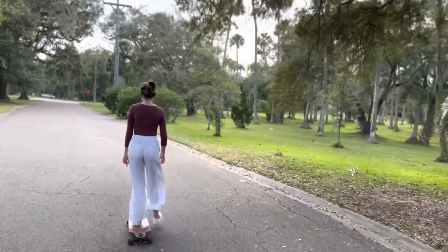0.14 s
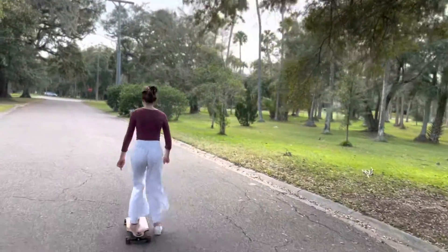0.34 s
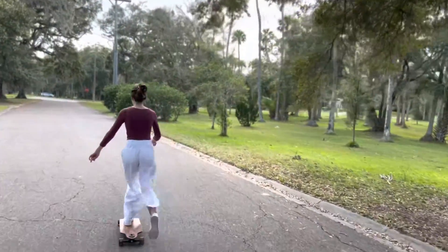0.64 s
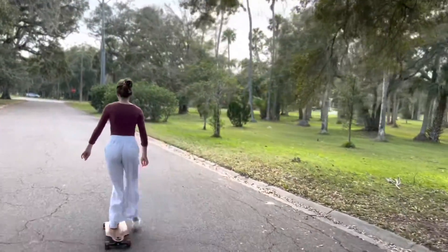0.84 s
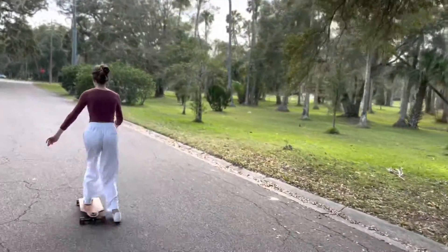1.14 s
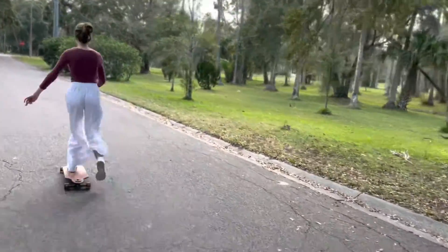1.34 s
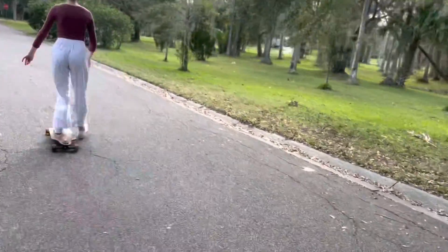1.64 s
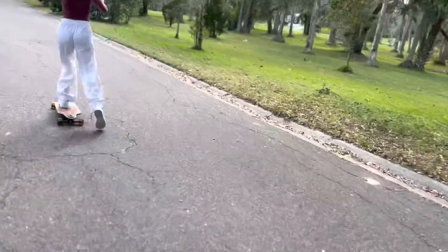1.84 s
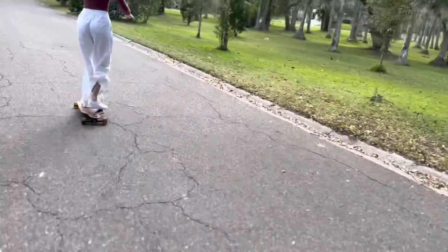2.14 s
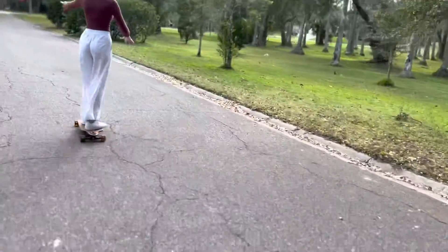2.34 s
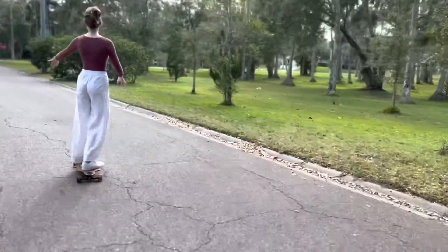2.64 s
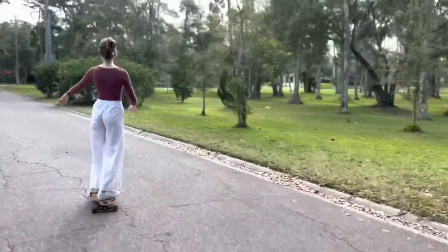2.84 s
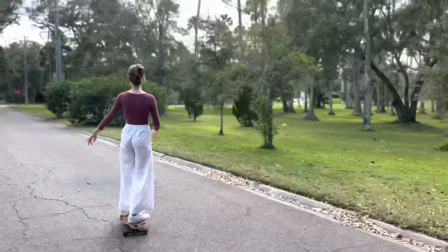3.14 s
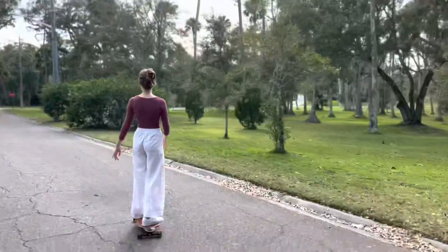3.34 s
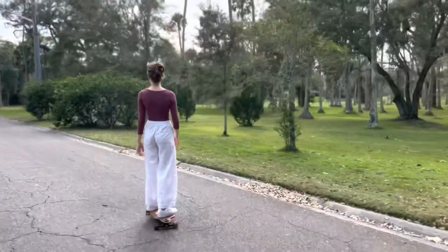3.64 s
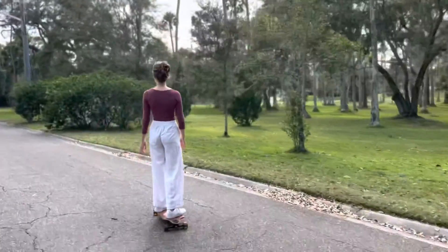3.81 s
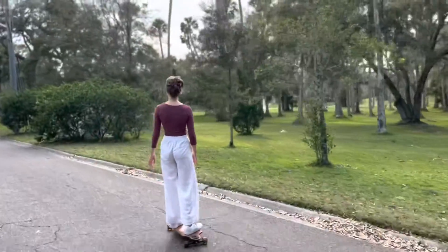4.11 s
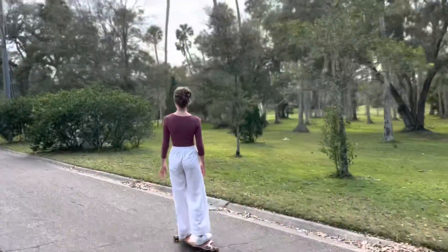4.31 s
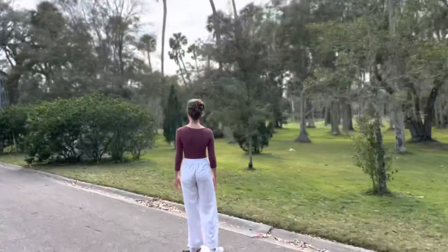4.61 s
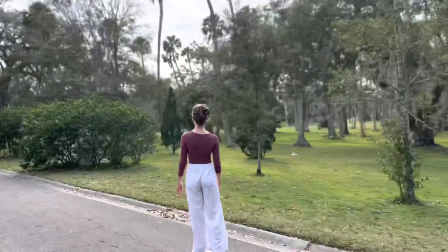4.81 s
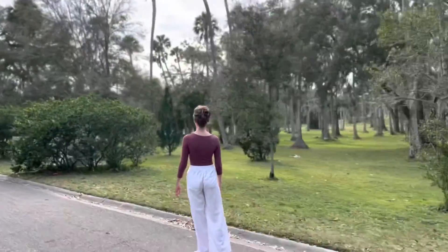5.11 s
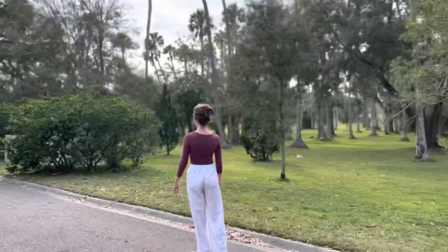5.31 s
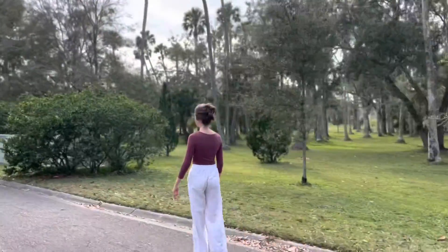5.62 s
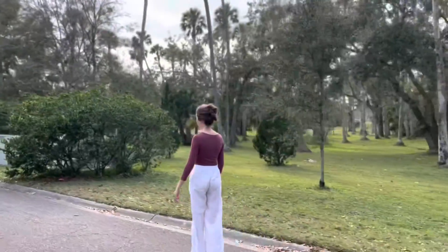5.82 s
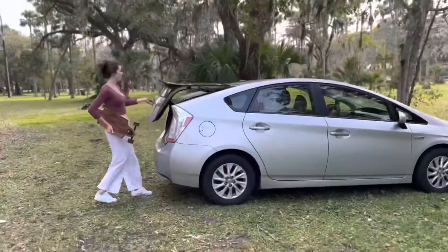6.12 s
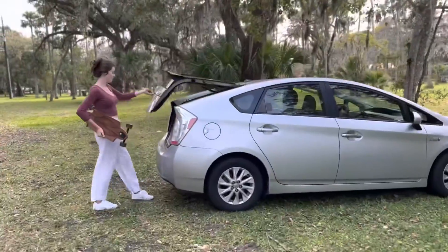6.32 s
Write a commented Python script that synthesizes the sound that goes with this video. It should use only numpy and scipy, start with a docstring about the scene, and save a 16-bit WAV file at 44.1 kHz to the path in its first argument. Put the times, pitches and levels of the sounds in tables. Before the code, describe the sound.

A skateboard rolls over old cracked asphalt in an open park, heard fairly close from behind. From 0 to 1.5 s, hollow mid-low wheel roar carries dense, uneven clacks and pebble ticks, thickest in the first 0.3 s, with fleeting wheel rings and a soft shoe scrape around 0.2 s. Another scrape peaks at 1.4 s; then smoother booming roll until a hard clack at 2.4 s, a strong scrape at 2.55 s and a heavy deck thump at 2.7 s. It glides more evenly until a rattling cluster and scrape at 3.55-3.75 s, then more knocks and ringing wheels at 4-4.6 s. From 4.7 s the roar thins as deep fluttering rumble and thumps grow, with faint bearing jingle and tiny high bird whistles at 5.1-5.9 s. At 5.9 s everything cuts to very quiet lawn air; dry leaves rustle briefly from about 6.35 s.

```python
"""Skateboard on old asphalt, then a quiet lawn

Random grains of road texture excite the resonances of deck and wheels; short gritty contacts make clacks,
and the deck's boom swells and thumps. Scrapes, tread hiss and jingling bearings are noise and tiny impacts.
A rough stretch rumbles as coloured noise, and small birds whistle as gliding sines.
Then the scene changes abruptly to still air over a lawn, with a short rustle of dry leaves made of grains."""
import sys
import numpy as np
from scipy import signal
from scipy.fft import rfft, irfft, next_fast_len
from scipy.io import wavfile

SR = 44100
rng = np.random.default_rng(int(sys.argv[2]) if len(sys.argv) > 2 else 0)


def wrap_up_sound(samples):
    """Save the sound to the file named by the first command line argument, as 16-bit audio."""
    columns = np.atleast_2d(samples).T
    # keep every value between -1 and 1, then stretch to whole-number steps
    tamed = np.clip(columns, -1, 1)
    steps = np.round(tamed * 32767).astype(np.int16)
    wavfile.write(sys.argv[1], SR, steps)


N = 284886
TIME_S = np.arange(N) / SR
RIDE_END_S = 5.925


def from_db(db):
    """Logarithmic level: decibels to amplitude gain."""
    return 10 ** (np.asarray(db) / 20)


def rms_one(x):
    """Normalisation: scale the whole array to unit power."""
    return x / np.sqrt(np.mean(x ** 2) + 1e-20)


def in_time(rows):
    """Linear interpolation: each column of a curve, sample by sample."""
    knots_s, *columns = np.transpose(rows)
    return [np.interp(TIME_S, knots_s, column) for column in columns]


def gain_at(points, hz):
    """Spectral envelope: decibels interpolated over log frequency, as gain."""
    knots_hz, db = np.transpose(points)
    return from_db(np.interp(np.log(np.maximum(hz, 1)), np.log(knots_hz), db))


def colour(x, points):
    """Linear filtering: multiply the spectrum by a smooth, zero-phase gain."""
    size = next_fast_len(N, real=True)
    gain = gain_at(points, np.fft.rfftfreq(size, 1 / SR))
    return irfft(rfft(x, size) * gain, size)[..., :N]


def drift(per_s):
    """Random modulation: chance values joined by lines, of unit rms."""
    knots = rng.standard_normal(4000)
    return rms_one(np.interp(TIME_S * per_s, np.arange(len(knots)), knots))


def resonate(x, hz, width_hz):
    """Resonance: two equal sections in cascade, so a ring swells briefly, then dies; steep skirts."""
    r = np.exp(-np.pi * width_hz / SR)
    zeros = [(1 - r * r) / 2, 0, (r * r - 1) / 2]
    poles = [1, -2 * r * np.cos(2 * np.pi * hz / SR), r * r]
    section = zeros + poles
    tiny = 1e-18 * (np.arange(x.shape[-1]) % 3)   # keeps the filter state from vanishing
    return signal.sosfilt([section, section], x + tiny)


def strike(times, peak_db, hz, width_hz):
    """Impulse response: blows on one mode, each ringing up to its peak level."""
    clicks = np.zeros(N)
    clicks[np.clip(np.round(times * SR).astype(int), 0, N - 1)] = from_db(peak_db)
    return resonate(clicks, hz, width_hz) * np.e * SR / (2 * np.pi * width_hz)


def struck(contact, hz, width_hz, level_db):
    """Forced vibration: one mode rung by a contact, up to a given rms level at its loudest."""
    ring = resonate(contact, hz, width_hz)
    return ring / np.abs(ring).max(axis=-1, keepdims=True) * np.sqrt(2) * from_db(level_db)


def grains(per_s, spread_db, smooth):
    """Shot noise: mid and side trains of tiny uneven impacts, on a bed of smooth noise."""
    size_db = spread_db * np.minimum(rng.exponential(1, (2, N)), 4)
    sizes = from_db(size_db) * rng.choice([-1, 1], (2, N))
    impacts = rms_one(sizes * (rng.random((2, N)) < per_s / SR))
    return rms_one(impacts + smooth * rng.standard_normal((2, N)))


def air(spectrum, flutter_db, per_s):
    """Broadband noise: mid and side of one colour whose level flutters."""
    noise = colour(rng.standard_normal((2, N)), spectrum)
    return rms_one(noise * from_db(flutter_db * drift(per_s)))


# Colour of the still air over the lawn. Each row: frequency in Hz, relative density in dB per Hz.
LAWN_COLOUR = [(20, -16), (50, 7.5), (80, 5.5), (110, 3.5), (200, -8.5), (400, -21), (520, -18.5),
               (620, -22), (850, -15.5), (1150, -26), (1600, -27), (2700, -31.5), (5000, -42.5),
               (15000, -33)]


def lawn_air():
    """Ambient noise: a faint coloured bed, fluttering in level."""
    return air(LAWN_COLOUR, flutter_db=1.0, per_s=8.7) * from_db(-46)


# Swell of dry leaves underfoot. Each row: time in seconds, level in dB.
RUSTLE_LEVEL = [(5.95, -80), (6.12, -63), (6.22, -70), (6.335, -72), (6.358, -47), (6.385, -48),
                (6.415, -44), (6.435, -49), (6.46, -50)]
# Colour of the leaves. Each row: frequency in Hz, filter gain in dB.
LEAF_COLOUR = [(300, -8), (900, -4), (1700, -1.5), (3000, -5.5), (6000, -8.5), (9000, -12), (15000, -15)]


def leaves():
    """Granular friction: a dense train of small impacts, coloured and swelled."""
    crackle = colour(grains(per_s=2400, spread_db=2.5, smooth=0.67), LEAF_COLOUR)
    return rms_one(crackle) * from_db(in_time(RUSTLE_LEVEL)[0])


# Bird whistles. Each row: start in seconds, length in seconds, start pitch in Hz, end pitch in Hz,
# mid rms level in dB at the loudest, octave overtone in dB against the fundamental.
BIRD_WHISTLES = [(2.25, .08, 7300, 7100, -60, -30), (2.335, .075, 7100, 6850, -55, -30),
                 (5.06, .05, 6400, 6550, -58, -30), (5.25, .055, 6150, 5000, -62, 1),
                 (5.61, .06, 7100, 6900, -59, -30), (5.68, .1, 6900, 6550, -55, -30),
                 (5.785, .08, 6600, 6480, -52, -30)]


def birds():
    """Frequency modulation: thin, wavering whistles that bend at their ends."""
    out, waver_hz = np.zeros(N), 55 * drift(600)
    for start_s, length_s, from_hz, to_hz, level_db, octave_db in BIRD_WHISTLES:
        u = np.clip((TIME_S - start_s) / length_s, 0, 1)
        pitch_hz = from_hz + (to_hz - from_hz) * u ** 2 + waver_hz
        phase = 2 * np.pi * np.cumsum(pitch_hz) / SR
        tone = np.sin(phase) + from_db(octave_db) * np.sin(2 * phase)
        swell = 2 * np.sqrt(2 * u * (1 - u))
        out += from_db(level_db) * swell * tone
    return out * [[1], [.5]]


# Colour of the rumble. Each row: frequency in Hz, relative density in dB per Hz.
RUMBLE_COLOUR = [(20, -38), (45, -6.5), (85, -2.5), (140, -2), (220, -4.5), (330, -12), (550, -12.5),
                 (1200, -65.5), (4000, -69.5)]
# Swell of the rumble. Each row: time in seconds, mid level in dB.
RUMBLE_LEVEL = [(0, -32), (.7, -32.5), (1.4, -47), (2.0, -29.5), (3.4, -38.5), (3.56, -42), (3.7, -37),
                (4.3, -32.5), (4.7, -26), (5.05, -22), (5.18, -17), (5.5, -17.5), (5.9, -16.5)]


def road_rumble():
    """Random excitation: rough road as low, fluttering noise, weaker at the side than in the middle."""
    noise = air(RUMBLE_COLOUR, flutter_db=0.95, per_s=30)
    return noise * from_db(in_time(RUMBLE_LEVEL)[0]) * from_db([[0], [-6]])


# Modes of loose bearing parts. Each row: frequency in Hz, basic width in Hz, relative drive in dB.
BEARING_MODES = [(6550, 410, 2), (7030, 540, 4), (7600, 260, 7.5), (13400, 710, 2)]
# Steady jingle. Each row: time in seconds, level in dB, before random flutter.
JINGLE_LEVEL = [(0, -82), (2.7, -74), (3.05, -70), (3.4, -72), (4.6, -66), (5.5, -65), (5.75, -56),
                (5.9, -60)]
# Jolts that set the parts jingling harder. Each row: time in seconds, added peak level in dB.
JINGLE_FLURRIES = [(2.812, -54), (2.876, -60), (3.055, -52), (3.078, -56), (3.183, -66), (3.237, -60),
                   (3.421, -58), (3.717, -54), (3.791, -56), (3.911, -58), (4.09, -56), (4.281, -53),
                   (4.601, -52), (4.715, -52), (4.821, -59), (4.886, -48), (4.952, -55), (4.985, -57),
                   (5.141, -53), (5.424, -54), (5.53, -51), (5.683, -52), (5.886, -58)]
FLURRY_S = 0.0045   # from the peak of a flurry to a quarter of its gain


def bearings():
    """Modal excitation: irregular light ticks ring the bearing shields, in short flurries at each jolt."""
    level = from_db(in_time(JINGLE_LEVEL)[0] + 2.0 * drift(45))
    for jolt_s, peak_db in JINGLE_FLURRIES:
        level = level + from_db(peak_db) / (1 + ((TIME_S - jolt_s) / FLURRY_S) ** 2) ** 2
    ticks = grains(per_s=900, spread_db=1.5, smooth=.4)
    rings = sum(resonate(ticks * from_db(db), hz, width_hz * 2.0) for hz, width_hz, db in BEARING_MODES)
    return rms_one(rings) * level


# Colour of treads on grit. Each row: frequency in Hz, filter gain in dB.
HISS_COLOUR = [(1500, 11.5), (3000, -0.5), (4500, 7.5), (5600, 7.5), (7300, 7), (9000, 6.5), (10000, 3.5),
               (11100, 11), (12400, 0), (14300, 2.5), (15500, 4.5)]
# Swell of the tread hiss. Each row: time in seconds, level in dB.
HISS_LEVEL = [(0, -52), (0.65, -56), (1.0, -54.5), (1.4, -50.5), (2.2, -52), (2.45, -48), (2.95, -54.5),
              (3.3, -53.5), (3.68, -48.5), (3.9, -52), (4.4, -50.5), (4.7, -54), (5.6, -53), (5.8, -52),
              (5.9, -53)]


def tread_hiss():
    """Granular noise: grit crackles under the treads, in spurts that die within milliseconds."""
    bursts = 1.0 * (rng.random(N) < 35 / SR)
    decay = np.exp(-1 / (0.0052 * SR))
    spurts = signal.lfilter([1], [1, -decay], bursts + 1e-18)
    grit = grains(per_s=1700, spread_db=1.0, smooth=1.7) * (1 + spurts) * from_db(1.3 * drift(35))
    return rms_one(colour(grit, HISS_COLOUR)) * from_db(in_time(HISS_LEVEL)[0])


# A narrow ring near 590 to 660 Hz that comes and goes.
# Each row: time in seconds, level in dB, pitch in Hz.
WHEEL_RING_CURVE = [(0, -35, 645), (.24, -26, 650), (.38, -40, 664), (.55, -25, 617), (.75, -39, 630),
                    (1.2, -42.5, 630), (1.55, -30, 598), (1.9, -44, 600), (3.3, -43, 624), (4.05, -31, 588),
                    (4.3, -28, 613), (4.45, -26.5, 650), (4.6, -35, 657), (5.9, -40, 610)]
WHEEL_RING_WIDTH_HZ = 107


def wheels():
    """Time-varying resonance: sparse knocks ring one wheel mode; its pitch and level follow set curves."""
    level_db, hz = in_time(WHEEL_RING_CURVE)
    pole = np.exp(-np.pi * WHEEL_RING_WIDTH_HZ / SR)
    # shifting the knocks down to 0 Hz and the ring back up lets the pitch glide
    turn = np.exp(2j * np.pi * np.cumsum(hz) / SR)
    knocks = grains(per_s=120, spread_db=2.5, smooth=0.24) * turn.conj()
    ring = turn * signal.lfilter([1], [1, -2 * pole, pole * pole], knocks)
    return rms_one(ring.real) * from_db(level_db)


# A sole pushes off or the wheels scrub sideways. Each row: start in seconds, loudest moment in seconds,
# end in seconds, sole level in dB, wheel scrub drive in dB, crushed grit level in dB.
SCRAPE_EVENTS = [(-.08, 0.2, 0.26, -36, -45.5, -41), (1.24, 1.426, 1.53, -25, -40.5, -44),
                 (2.447, 2.55, 2.565, -21.5, -30.5, -40), (3.47, 3.693, 3.73, -30, -37, -38),
                 (4.3, 4.465, 4.58, -31, -41, -45)]


def stroke(level_db):
    """Contact loading: each scrape swells as the contact is loaded and stops as it lifts."""
    shapes = [np.interp(TIME_S, np.sort(row[:3]), [0, 1, 0]) for row in SCRAPE_EVENTS]
    return sum(from_db(db) * shape for db, shape in zip(level_db, shapes))


def near_scrapes(lead_s, width_s):
    """Gaussian window: a bell of height 1, lead_s ahead of the loudest moment of each scrape."""
    return sum(np.exp(-((TIME_S - row[1] + lead_s) / width_s) ** 2) for row in SCRAPE_EVENTS)


# Colour of a sole on asphalt. Each row: frequency in Hz, filter gain in dB.
SOLE_COLOUR = [(200, -20), (400, -15), (520, 16.5), (620, 1), (800, 12), (1100, 7), (1450, -3.5),
               (1800, 6.5), (2400, -4.5), (3000, -20), (3600, -18), (4300, -36), (7000, -46), (14000, -64)]
# Colour of grit cracking under load. Each row: frequency in Hz, filter gain in dB.
GRIT_COLOUR = [(900, 32), (1800, 15), (2600, 14), (3700, 12), (4600, 20), (5400, -40), (12000, -24)]


def scrapes():
    """Stick-slip friction: the sole grinds in dense grains; single bits of grit crack brightly."""
    _, _, _, sole_db, _, grit_db = np.transpose(SCRAPE_EVENTS)
    slips = grains(per_s=330, spread_db=2.2, smooth=.18) * from_db(3.0 * drift(130))
    cracks = grains(per_s=110, spread_db=1.6, smooth=.08)
    sole = rms_one(colour(slips, SOLE_COLOUR)) * stroke(sole_db)
    grit = rms_one(colour(cracks, GRIT_COLOUR)) * stroke(grit_db)
    return sole + grit


# Boom of the deck on uneven road. Each row: time in seconds, drive in dB, before swing, unloading and trim.
BOOM_DRIVE = [(0, -40), (.3, -36.5), (.5, -25.5), (.8, -23), (1.03, -27.5), (1.17, -22.5), (1.4, -35.5),
              (1.69, -19), (2.03, -29.5), (2.2, -21.5), (2.5, -35), (2.66, -16.5), (2.82, -22), (3.45, -30),
              (3.8, -25), (4.25, -24.5), (4.65, -31), (5.1, -45)]
# Low thumps of the deck, and a few brief low swells near 200 Hz. Each row: time in seconds, peak level in dB,
# pitch in Hz.
LOW_THUMPS = [(1.245, -18, 201), (1.6, -17.5, 192), (2.171, -19, 94), (2.378, -12, 95), (2.646, -11.5, 93),
              (2.675, -7.5, 98.3), (3.1, -28, 55), (3.558, -13, 65), (3.716, -15.5, 84), (3.956, -24, 55),
              (4.116, -16.5, 92), (4.236, -16, 92.5), (4.383, -14.5, 75), (4.506, -16, 91.5),
              (4.872, -13, 86.5), (5.19, -13, 88.5), (5.295, -11.5, 206), (5.505, -10.5, 111),
              (5.63, -10.5, 200), (5.845, -11.5, 71)]
DECK_HZ, DECK_WIDTH_HZ, THUMP_WIDTH_HZ = 104, 54, 41
BOUNCE_SWING_DB, BOUNCES_PER_S = 2.5, 18   # the boom comes and goes by chance
UNLOAD_DB, UNLOAD_S = 25, 0.043   # it drops while a scrape takes weight off the deck


def deck():
    """Bending vibration: the loaded deck booms at its lowest mode, with low thumps and swells."""
    swing_db = BOUNCE_SWING_DB * drift(BOUNCES_PER_S)
    unload_db = UNLOAD_DB * near_scrapes(0, UNLOAD_S)
    boom_db = in_time(BOOM_DRIVE)[0] + swing_db - unload_db - 4.5
    boom = rms_one(resonate(rng.standard_normal((2, N)), DECK_HZ, DECK_WIDTH_HZ)) * from_db(boom_db)
    thumps = sum(strike(s, peak_db, hz, THUMP_WIDTH_HZ) for s, peak_db, hz in LOW_THUMPS)
    return boom + thumps * [[1], [0]]   # thumps in the middle only


# Small stones met, thick on the crumbling stretch at first. Each row: time in seconds, stones per second.
PEBBLE_DENSITY = [(0, 70), (.27, 70), (.33, 22), (1.45, 30), (1.55, 5), (6, 8)]
PEBBLE_DB, PEBBLE_SPREAD_DB, PEBBLE_CRACK_DB = -30, 9, -5   # top ring, range below it, crack against ring


def pebbles(count=80):
    """Random arrivals: small stones at a varying rate, as rows like those of the clacks."""
    met = np.cumsum(in_time(PEBBLE_DENSITY)[0]) / SR
    times = np.interp(np.arange(count) + rng.random(count), met, TIME_S)
    ring_db = PEBBLE_DB - PEBBLE_SPREAD_DB * rng.random(count)
    ring_hz = rng.uniform(1000, 1240, count)
    return np.column_stack([times, ring_db, ring_hz, ring_db + PEBBLE_CRACK_DB])


# Modes of deck, trucks and wheels. Each row: frequency in Hz, width in Hz when rolling,
# relative drive in dB when rolling, when chattering, when struck.
BOARD_MODES = [(189.5, 121.4, -3, -12, -40), (265.2, 102, -6, 0.5, -10), (466.4, 45, -4.5, -11, -12.5),
               (606.6, 190, -1.5, -15, -33.5), (778.8, 47, -14.5, 8.5, -12), (1035, 118, -15.5, 6.5, -51),
               (1209.3, 66, -41, 7, -32), (1657, 141, -69, -4, -8), (2132, 62, -49, -5.5, -14),
               (2370, 118, -38.5, -12.5, -14.5), (2560, 640, -63.5, -8, -25.5),
               (3470, 210, -45, -17, -24.5), (3870, 1800, -48, -23, -25.5)]
# Clacks of wheels, and chance dull swells of the rolling near 600 Hz. Each row: time in seconds,
# leading ring in dB (mid rms at its loudest), ring pitch in Hz, drive of the bright part in dB.
WHEEL_CLACKS = [(0.0144, -28, 1110, -30), (0.0298, -39, 1230, -40), (0.0447, -20, 615, -50),
                (0.0671, -21, 1100, -24), (0.0879, -19.5, 1120, -35), (0.1166, -22.5, 1090, -28),
                (0.1562, -43, 1180, -32), (0.1684, -24, 1160, -18), (0.1799, -34, 1120, -31),
                (0.1874, -23, 1050, -26), (0.2002, -35, 1080, -28), (0.2332, -27, 1190, -36),
                (0.272, -40, 1110, -31), (0.2506, -23, 1140, -23), (0.2954, -24, 567, -38),
                (0.33, -21, 1170, -26.5), (0.4265, -20, 1235, -28), (0.4721, -29.5, 1100, -26),
                (0.5366, -29.5, 1220, -24), (0.5452, -24.5, 1020, -37), (0.5534, -24, 890, -23),
                (0.5858, -20, 1100, -29), (0.6558, -27, 1140, -35), (0.7666, -17.5, 1145, -26),
                (0.9359, -17.5, 1160, -23), (0.9621, -18.5, 1190, -24), (0.9775, -20.5, 990, -42),
                (1.0678, -24, 1050, -30), (1.1154, -19, 1030, -28), (1.1355, -29, 980, -24.5),
                (1.2031, -25, 1040, -43), (1.25, -23, 1020, -25.5), (1.2868, -24, 970, -27),
                (1.3137, -31, 1120, -27), (1.3372, -21, 1160, -24), (1.3649, -25, 1110, -26),
                (1.3855, -20, 1114, -17.5), (1.4329, -35, 1020, -24), (1.4616, -17.5, 1060, -19.5),
                (2.2156, -27, 1100, -33), (2.3704, -10.5, 1230, -19.5), (2.4157, -17, 1120, -26),
                (2.4226, -17, 1130, -24), (2.4864, -17, 1040, -22), (2.5386, -13, 1110, -20),
                (2.5507, -19, 940, -25), (2.5632, -15, 1060, -19), (2.5986, -18, 990, -25),
                (3.1905, -25, 930, -31), (3.2199, -33, 585, -50), (3.5633, -23, 1120, -18),
                (3.5895, -17, 1066, -15.5), (3.5935, -17, 1100, -20), (3.604, -30, 1090, -35),
                (3.637, -30, 1090, -36), (3.6439, -15.5, 1090, -33), (3.6574, -16.5, 1180, -20),
                (3.67, -20, 1110, -29), (3.696, -27, 1110, -17), (3.702, -16, 1060, -31),
                (3.708, -14, 1014, -17), (3.739, -20.5, 1144, -23), (4.0161, -27, 582, -54),
                (4.0464, -21.5, 640, -48), (4.0701, -19, 590, -48), (4.187, -18, 1110, -27.5),
                (4.1969, -14.5, 1094, -27), (4.322, -14, 584, -22), (4.372, -23, 1210, -25),
                (4.4055, -22, 630, -50), (4.4278, -12.5, 630, -40), (4.441, -17.5, 1080, -17.5),
                (4.4808, -22, 1130, -18), (4.494, -14.5, 623, -38), (4.4988, -22.5, 1220, -19),
                (4.562, -19, 1140, -23), (4.5924, -21.5, 590, -44), (4.7213, -24, 1060, -36),
                (4.7277, -18.5, 1142, -23), (4.9852, -31, 1110, -28), (4.999, -19, 1100, -30),
                (5.0678, -22.5, 1120, -30), (5.1016, -23, 1200, -32), (5.2001, -23, 1090, -28),
                (5.3359, -26, 1110, -31), (5.3468, -22.5, 1080, -28), (5.4138, -21.5, 1130, -31),
                (5.4839, -30, 1110, -31), (5.5305, -29.5, 1110, -33), (5.7809, -25.5, 1130, -36),
                (5.8234, -24.5, 1130, -43)]
CONTACT_S, SWELL_S = 0.0019, 0.00155   # half-width of the contact; the ring peaks this much later
SCATTER_DB, SCATTER_T60_S = -20, .07   # the contact then scatters through trucks and bearings
RING_WIDTH_HZ, DETUNE = 170, 0.074   # leading ring; share by which modes shift from blow to blow


def clacks():
    """Impact excitation: a short gritty contact; one ring leads, low modes follow it, high modes add the bright part."""
    lead, size = SR // 200, SR // 12   # samples
    t = (np.arange(size) - lead) / SR
    scatter = (t > 0) * from_db(SCATTER_DB - 60 * t / SCATTER_T60_S)
    envelope = np.exp(-(t / CONTACT_S) ** 2) + scatter
    out = np.zeros((2, N + size))
    for hit_s, ring_db, ring_hz, bright_db in np.vstack([WHEEL_CLACKS, pebbles()]):
        contact = envelope * rng.standard_normal((2, size))
        shifts = 1 + DETUNE * rng.standard_normal(len(BOARD_MODES))
        blow = struck(contact, ring_hz, RING_WIDTH_HZ, ring_db)
        blow += struck(contact, hz=6100, width_hz=12000, level_db=bright_db - 36)
        for (hz, width_hz, _, _, struck_db), shift in zip(BOARD_MODES, shifts):
            drive_db = ring_db if hz < 1450 else bright_db
            blow += struck(contact, hz * shift, width_hz * 2.17, drive_db + struck_db)
        start = int(np.clip((hit_s - SWELL_S) * SR, 0, N))
        out[:, start:start + size] += blow
    return out[:, lead:lead + N] * from_db([[0], [-3]])


# Wheel roar, rising with each push and sinking as the board coasts.
# Each row: time in seconds, drive in dB, before trim and random flutter.
ROAR_DRIVE = [(0, -25.0), (0.2, -24.5), (0.4, -28), (1.05, -25.5), (1.3, -23.5), (1.55, -22), (1.8, -23),
              (2.05, -25), (2.55, -17.5), (2.85, -23), (3.3, -22.5), (3.55, -20), (3.9, -22.5), (4.42, -19),
              (4.7, -25), (5.2, -25.5), (5.9, -28)]
CHATTER_DB, CHATTER_FOLLOWS = -52.5, 0.086   # chatter drive at mean roar; share of the roar's swing
LEAN_DB, LEAN_S, LEAN_LEAD_S = 5.5, 0.23, 0.16   # more chatter as the rider leans into a scrape


def rolling():
    """Modal synthesis: fine grain hums the low modes; coarse stones and scrubbing wheels wake the high ones."""
    roar_db = in_time(ROAR_DRIVE)[0]
    lean_db = LEAN_DB * near_scrapes(LEAN_LEAD_S, LEAN_S)
    chatter_db = CHATTER_DB + CHATTER_FOLLOWS * (roar_db - roar_db.mean()) + lean_db
    fine = grains(per_s=2500, spread_db=1.0, smooth=0.61) * from_db(roar_db - 3.5 + 1.68 * drift(70))
    coarse = grains(per_s=250, spread_db=4.5, smooth=0.94) * from_db(chatter_db + 2.0 * drift(60))
    scrub_db = np.array(SCRAPE_EVENTS)[:, 4]
    coarse = coarse + grains(per_s=520, spread_db=2.5, smooth=0.67) * stroke(scrub_db)
    unloaded = from_db(-4 * near_scrapes(0, 0.04))   # the deck's low modes ease off during a scrape
    out = 0
    for hz, width_hz, roll_db, coarse_db, _ in BOARD_MODES:
        unit_power = np.sqrt(2 * SR / (np.pi * width_hz))
        # the rider's shifting weight favours now one mode, now another
        loading = from_db(1.3 * drift(6))
        if hz < 400:
            loading = loading * unloaded
        drive = fine * from_db(roll_db) + coarse * from_db(coarse_db)
        out = out + unit_power * resonate(drive * loading, hz, width_hz)
    return out


# Stereo width. Each row: frequency in Hz, gain of the side signal in dB.
SIDE_GAIN = [(60, -3.5), (200, -7.5), (380, -12.5), (700, -12.5), (1290, -22), (2380, -10), (3300, -1),
             (4500, 0), (5400, -7.5), (6800, -1.5), (8100, -5.5), (9400, -3), (10000, -50.5), (11900, 3),
             (13000, -23), (15500, -10)]
# Stereo balance. Each row: frequency in Hz, left minus right in dB.
LEFT_OVER_RIGHT = [(60, 0), (200, -1.5), (380, 3.5), (700, -1), (1290, 1), (2380, 0), (4000, 2.5),
                   (5500, 10.5), (7300, -0.5), (9000, -1), (10000, -2), (15000, 1.5)]
# Phase between the channels. Each row: frequency in Hz, lag of the right channel in radians.
RIGHT_LAG = [(0, 0), (2300, .05), (3000, .7), (4500, 1.5), (5800, 1.9), (7400, 0), (8400, -1.1),
             (9900, -3.1), (10700, -3.2), (12400, -6.28), (14400, -6.28), (15800, -9)]


def to_stereo(mid_side):
    """Mid-side decoding: width, balance and the right channel's phase lag vary with frequency."""
    mid, side = mid_side[0], colour(mid_side[1], SIDE_GAIN)
    left = colour(mid + side, [(hz, db / 2) for hz, db in LEFT_OVER_RIGHT])
    right = colour(mid - side, [(hz, -db / 2) for hz, db in LEFT_OVER_RIGHT])
    size = next_fast_len(N, real=True)
    lag = np.interp(np.fft.rfftfreq(size, 1 / SR), *np.transpose(RIGHT_LAG))
    lagged = irfft(rfft(right, size) * np.exp(-1j * lag), size)[:N]
    return np.array([left, lagged])


def scene():
    """Superposition: the layers of the ride add up, then the quiet lawn takes over."""
    lawn = lawn_air() + leaves()
    ride = birds() + road_rumble() + bearings() + tread_hiss() + wheels()
    ride = ride + scrapes() + deck() + clacks() + rolling()
    riding = np.clip((RIDE_END_S - TIME_S) / 0.03 + .5, 0, 1)
    settled = np.clip((TIME_S - RIDE_END_S) / 0.05, 0, 1)   # the lawn fades in
    return to_stereo(ride * riding + lawn * settled)


def record(dry):
    """Saturation and band-limiting: the highest peaks are rounded off and the top is cut steeply."""
    rounded = dry / (1 + (dry / .8) ** 6) ** (1 / 6)
    low_pass = signal.ellip(10, .2, 80, 15800, fs=SR, output="sos")   # ripple dB, stop dB, cutoff Hz
    return signal.sosfilt(low_pass, rounded)


dry = scene()
out = record(dry)
wrap_up_sound(out)
```